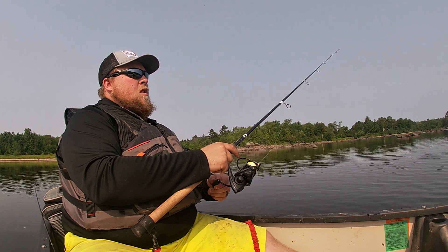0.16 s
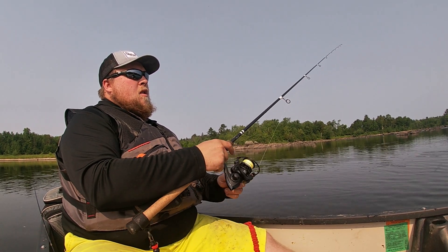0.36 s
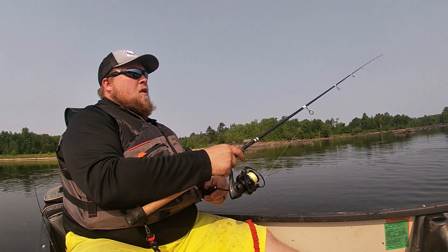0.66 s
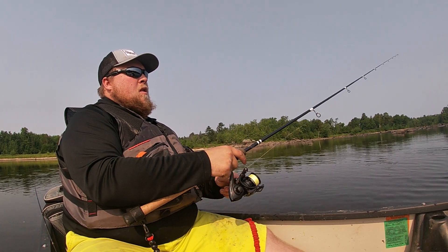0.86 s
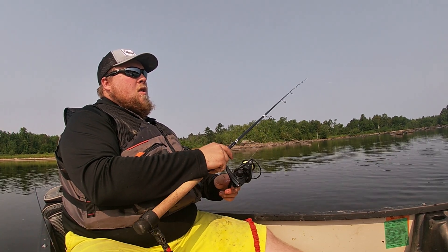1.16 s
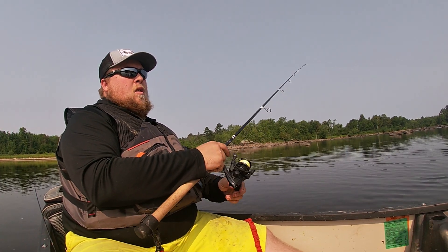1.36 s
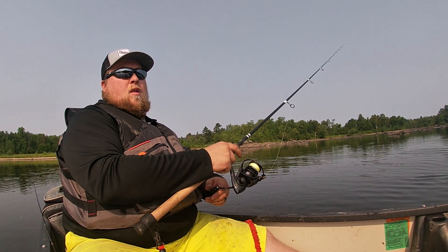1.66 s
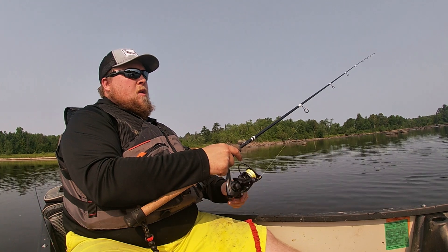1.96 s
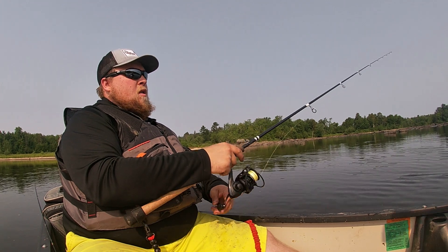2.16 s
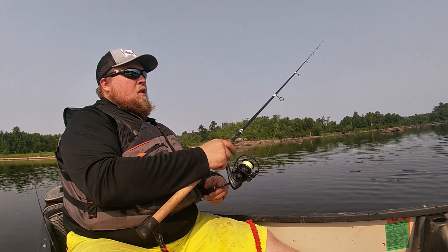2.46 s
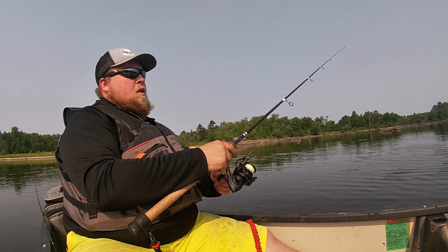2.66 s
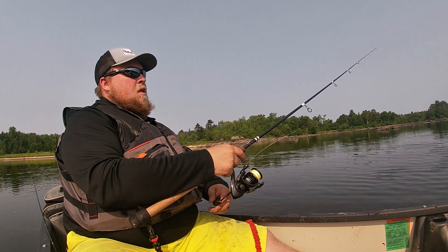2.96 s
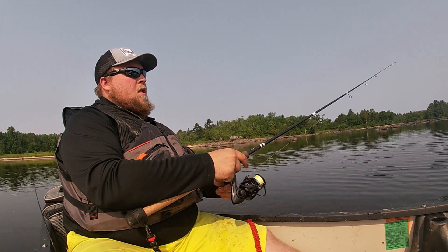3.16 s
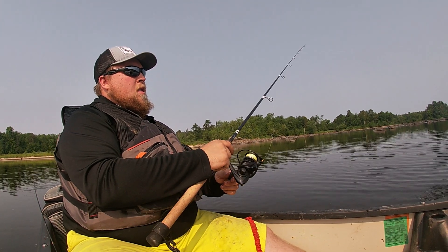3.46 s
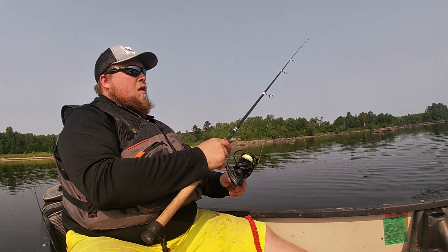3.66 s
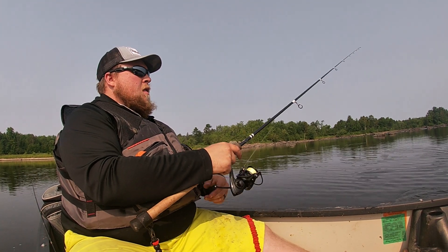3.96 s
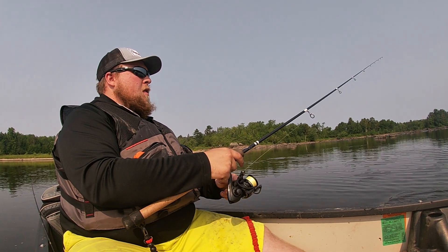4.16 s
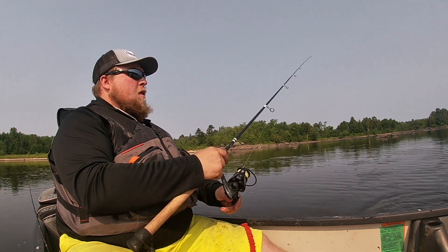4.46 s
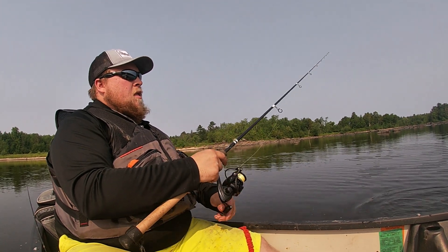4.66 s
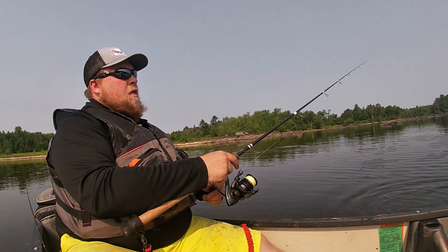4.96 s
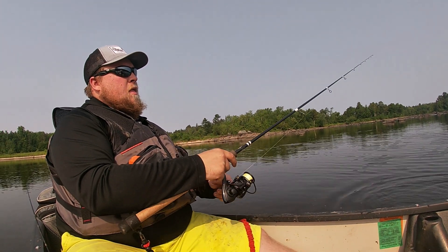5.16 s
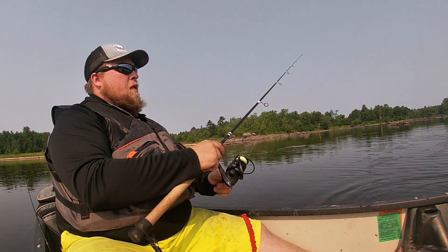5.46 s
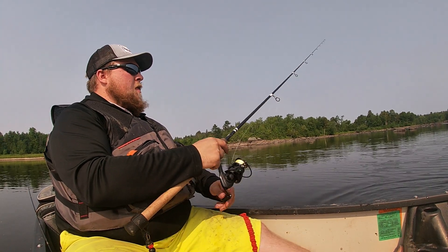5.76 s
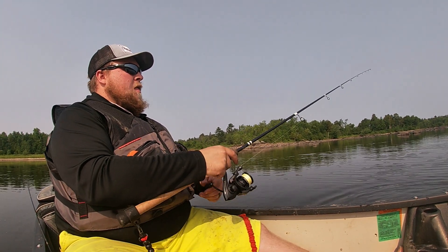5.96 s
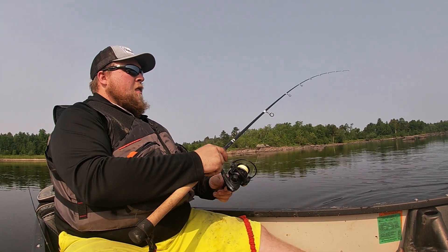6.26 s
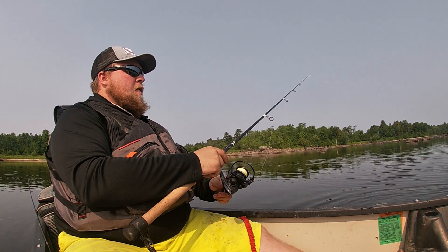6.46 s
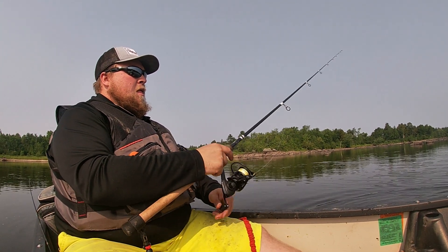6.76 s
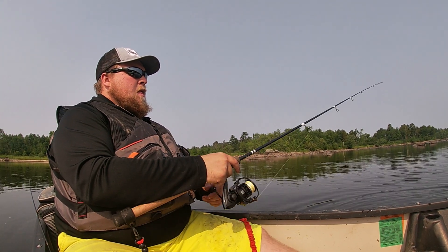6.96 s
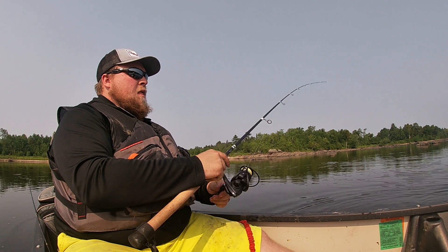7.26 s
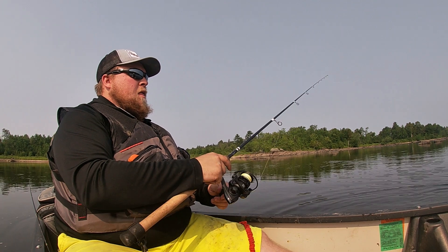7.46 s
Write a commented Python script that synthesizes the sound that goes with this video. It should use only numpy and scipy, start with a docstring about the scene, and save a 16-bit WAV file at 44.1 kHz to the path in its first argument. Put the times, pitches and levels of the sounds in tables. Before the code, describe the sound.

A soft, low hull rumble continues throughout, close and dry, with faint water wash and cloth hiss. From 0 to 0.9 s feet and gear strike the hollow canoe: a hard boomy knock at once, a dull thump at 0.14, clacks around 0.4-0.5, then a dense loud clatter at 0.64-0.86 with brief scrapes and ticks. A bird whistles faintly at 0.5. After a lull, smaller knocks come at 1.5-1.9, strongest near 1.73 and 1.84. A distant bird twitters quickly at 1.9-2.5. From 3.0 to 4.6 wavelets splash, plop and gurgle at the side, busiest at 3.7-4.5, with bright drips and low glugs. Heavy padded thuds land around 4.8. Sparse bubbles, small gear ticks, rustles and faint birds occupy 5-7 s. Soft hollow thumps cluster at 7.05-7.35, with one more at 7.55.

```python
"""Fishing from a canoe

An angler works a spinning rod in a canoe on calm water. Feet and gear knock and scrape on the hull: damped modes.
Wavelets lap and gurgle at the side as swarms of ringing bubbles; the reel ticks in bursts of resonant noise.
A jacket rustles and the hull rumbles softly all the time, both as shaped noise.
Songbirds, gliding sine tones, whistle faintly from the wooded shore."""
import sys
import numpy as np
from scipy import signal
from scipy.fft import rfft, irfft, next_fast_len
from scipy.io import wavfile
from scipy.ndimage import uniform_filter1d, map_coordinates

SR = 44100
rng = np.random.default_rng(int(sys.argv[2]) if len(sys.argv) > 2 else 0)


def int16_out(signal):
    """Quantize to a 16-bit WAV file."""
    q = np.round(np.clip(np.atleast_2d(signal).T, -1, 1) * 32767)
    wavfile.write(sys.argv[1], SR, q.astype(np.int16))


N = 336042  # samples in the scene


def amp(db):
    """Decibels to gain."""
    return 10 ** (np.asarray(db) / 20)


def unit(x):
    """Scale to rms 1."""
    return x / np.sqrt(np.mean(x ** 2) + 1e-20)


def along(points, hz):
    """(Hz, value) points interpolated on a logarithmic frequency axis."""
    f, v = np.transpose(points)
    return np.interp(np.log(hz + 1), np.log(f + 1), v)


def curves(rows):
    """One value per sample for each column after the time."""
    s, *cols = np.transpose(rows)
    return [np.interp(np.arange(N) / SR, s, c) for c in cols]


def wobble(rate):
    """A smooth random curve with rate knots a second."""
    knots = rng.standard_normal(int(N * rate / SR) + 4)
    return map_coordinates(knots, [np.arange(N) * rate / SR])


def filtered(x, response):
    """Linear filtering: the spectrum of x times a gain of frequency."""
    m = next_fast_len(len(x) + 8192)
    return irfft(rfft(x, m) * response(np.fft.rfftfreq(m, 1 / SR)), m)[:len(x)]


def causal(x, gain, size):
    """Minimum phase: a body with the given gain of frequency rings only after it is struck."""
    cepstrum = irfft(np.log(gain(np.fft.rfftfreq(size, 1 / SR))))
    cepstrum[1:size // 2] *= 2
    cepstrum[size // 2 + 1:] = 0
    return signal.fftconvolve(x, irfft(np.exp(rfft(cepstrum))))[:len(x)]


def noise(colour, patchy_db=2):
    """Random excitation of rms 1 with a given spectrum and drifting patches of gain."""
    z = signal.stft(rng.standard_normal(N), nperseg=512)[2]
    field = uniform_filter1d(rng.standard_normal(z.shape), size=4, axis=0)
    field = uniform_filter1d(field, size=10, axis=1)
    patchy = signal.istft(z * amp(patchy_db * unit(field)), nperseg=512)[1][:N]
    return unit(filtered(patchy, lambda hz: amp(along(colour, hz))))


def add(track, s, sound):
    """Superposition: mix a sound into the track at time s."""
    start = max(0, round(s * SR))
    part = sound[:max(0, N - start)]
    track[start:start + len(part)] += part


def swell(s, length, attack, release):
    """An envelope that rises around time s, holds for the length, then decays exponentially."""
    start, end = max(0, round((s - attack / 2) * SR)), round((s + length + 8 * release) * SR)
    out, t = np.zeros(N), np.arange(start, end) / SR - s
    add(out, s + t[0], np.clip(t / attack + .5, 0, 1) * np.exp(-np.maximum(t - length, 0) / release))
    return out


def broad_peak(f, hz, width, top_hz, order):
    """A strongly damped resonance: a broad peak in log frequency, rolled off above top_hz."""
    return 1 / (1 + (np.log((f + 1) / hz) / width) ** 2) / (1 + (f / top_hz) ** order)


# Spectra of the sway and the drone. Each row: frequency in Hz, relative density in dB per Hz.
SWAY = [(10, 22), (25, 5.5), (48, 21), (70, 16), (120, -55.5)]
DRONE = [(45, -32.5), (65, -6), (95, -6), (125, 3.5), (150, 2), (200, -8), (290, -13.5), (400, -21.5),
         (600, -54), (1000, -39), (2500, -109.5)]
# How hard the boat sways. Each row: time in seconds, level in dB before sway_db.
ROCKING = [(0, -33.5), (.42, -49.5), (.85, -65), (1.7, -48), (2.1, -61), (2.6, -45), (2.9, -55.5),
           (3.35, -46), (3.9, -56), (4.6, -57), (5.2, -60.5), (5.56, -43.5), (5.59, -34), (5.63, -45),
           (5.85, -51), (6.26, -52), (6.35, -34.5), (6.62, -44), (6.9, -36.5), (7.6, -45)]
# How loudly the hollow hull drones. Each row: time in seconds, level in dB before drone_db.
DRONING = [(.55, -39.5), (.9, -44), (1.5, -39.5), (2.1, -44), (3.3, -44.5), (4.5, -47), (5.25, -50.5),
           (6.4, -47), (6.65, -48.5), (7.15, -47.5), (7.6, -50)]


def rumble(sway_db=1, drone_db=1, throb_db=0.5, throb_rate=12):
    """Forced vibration: air and water rock the boat, and the hollow hull drones with them."""
    (sway,), (drone,) = curves(ROCKING), curves(DRONING)
    rocking = amp(sway + sway_db) * noise(SWAY, patchy_db=3.5)
    throb = throb_db * wobble(throb_rate)
    return rocking + amp(drone + drone_db + throb) * noise(DRONE, patchy_db=0.5)


# A songbird's slurred syllables. Each row: start in seconds, length in seconds, first pitch in Hz,
# last pitch in Hz, arch of the pitch in Hz, level in dB before level_db and the flutter.
SYLLABLES = [(0.502, 0.16, 3360, 2700, 99, -53), (1.878, 0.061, 3350, 3780, 127, -65),
             (1.937, .028, 3590, 3740, 160, -64), (1.972, 0.038, 3700, 3800, 170, -67),
             (2.005, 0.039, 3500, 3550, 51.5, -65), (2.034, 0.053, 3600, 3130, -110, -58.5),
             (2.174, 0.035, 3200, 3500, 638, -63.5), (2.215, 0.016, 3400, 4550, 0, -59),
             (2.227, 0.037, 4440, 4680, -2, -62), (2.253, 0.059, 4250, 3280, -130, -56),
             (2.307, 0.045, 3300, 2700, 50, -56), (2.335, .034, 2720, 2870, 0, -55),
             (2.36, 0.035, 2830, 3080, 43, -56), (2.396, 0.043, 2950, 3600, 90, -54),
             (2.435, 0.031, 3200, 3140, -28, -57), (5.084, 0.091, 2930, 2350, 6, -58.5),
             (5.32, 0.031, 3370, 3730, 14, -60), (5.399, 0.019, 3350, 2820, 40, -54.5),
             (5.478, .032, 2430, 2660, 2, -66), (5.503, 0.064, 2630, 2350, -20, -64),
             (5.552, 0.066, 2380, 3210, 81, -58), (6.543, 0.036, 4050, 3300, 0, -67),
             (7.107, 0.053, 3050, 3260, 96, -62), (7.174, 0.037, 2560, 3600, 245, -60),
             (7.353, 0.063, 3520, 2870, -85, -57.5)]
# A second, farther bird holds its pitch through each note. Each row: start in seconds, length in seconds,
# pitch in Hz, level in dB.
FAR_NOTES = [(4.588, .27, 3580, -69.5), (5.063, 0.053, 3520, -66), (5.21, 0.054, 3450, -67),
             (5.335, 0.058, 3450, -65), (5.455, 0.13, 3420, -78), (5.84, 0.37, 3440, -70)]


def birds(level_db=-3, waver=.02, flutter_db=2.8, echo_db=-7, echo_t60=.22):
    """Frequency modulation and scattering: a hoarse sliding song and held notes, blurred by the shore's trees."""
    song, hoarse = np.zeros(N), 1 + waver * (wobble(900) + wobble(60) / 2)
    for s, length, first_hz, last_hz, arch_hz, db in SYLLABLES:
        u = np.linspace(0, 1, int(length * SR))
        hz = first_hz + (last_hz - first_hz) * u + arch_hz * np.sin(np.pi * u)
        hz = hz * hoarse[round(s * SR):][:len(u)]
        envelope = np.sqrt(np.abs(np.sin(np.pi * u)))
        add(song, s, amp(db + level_db) * envelope * np.sin(2 * np.pi * np.cumsum(hz) / SR))
    song = song * amp(flutter_db * wobble(120))
    for s, length, note_hz, note_db in FAR_NOTES:
        t = np.arange(int(length * SR)) / SR
        add(song, s, amp(note_db) * np.sin(np.pi * t / length) * np.sin(2 * np.pi * note_hz * t))
    t = np.arange(SR // 2) / SR
    trees = rng.standard_normal(len(t)) * amp(-60 * t / echo_t60)
    return song + amp(echo_db) * signal.fftconvolve(song, trees / np.linalg.norm(trees))[:N]


# Spectra of the four bands of hiss, low to high. Each row: frequency in Hz, relative gain in dB.
GURGLE_COLOUR = [(200, 9.5), (450, 8), (750, 6), (1100, -12.5), (2000, -40.5)]
WASH_COLOUR = [(600, 5), (1200, 6), (1800, 3.5), (2200, 1.5), (3000, 2.5), (4300, -12.5), (8000, -48)]
RUSTLE_COLOUR = [(1500, -48.5), (3200, -3.5), (4500, 1.5), (6300, -1), (7500, -41.5), (10000, -27)]
FIZZ_COLOUR = [(5000, -2), (7000, 7.5), (8300, 4), (9500, -5.5), (11000, -12.5), (13500, -44), (15000, -39)]
# The water's slow stir along the side. Each row: time in seconds, deep gurgle in dB, surface wash in dB.
STIR = [(0, -45, -62), (1.2, -52, -63.5), (2.1, -57.5, -64.5), (2.8, -55, -63), (3.5, -51, -59),
        (4.3, -52, -53), (5.1, -62, -61), (7.6, -59, -66.5)]
# The treble hiss. Each row: time in seconds, level in dB.
TREBLE = [(0, -66), (.45, -74.5), (.8, -88.5), (2.75, -87), (3.3, -70.5), (4.3, -65.5), (4.95, -66),
          (5.45, -74.5), (5.95, -66.5), (6.65, -75.5), (6.95, -69.5), (7.6, -79)]
# Strokes of sleeve and gear. Each row: start in seconds, length in seconds, level in dB, brightness in dB.
RUBS = [(0.147, 0.2, -79, -15), (0.335, 0.082, -80, -5), (0.5, 0.16, -69, -19.5), (0.695, 0.13, -70, -25),
        (1.019, 0.17, -71, -21), (1.203, 0.15, -70, -18), (1.47, 0.11, -66, -13), (2.227, 0.027, -69, -4.5),
        (2.319, 0.087, -66.5, -11), (5.702, 0.18, -68, 6.5), (6.749, 0.051, -62, -0.5),
        (7.554, 0.094, -61.5, -1)]


def hiss(waves, grain_db=1.5, surge_db=-8, cloth_db=-78, rub_attack=.09, rub_release=0.036):
    """Friction and turbulence: water washes by, cloth and gear rub; dull strokes scrape, bright ones fizz."""
    # independent noises add as powers
    gurgle, wash = amp(curves(STIR)) ** 2 + (amp(surge_db) * waves) ** 2
    fizz = amp(curves(TREBLE)[0]) ** 2
    rustle = amp(cloth_db) ** 2 + fizz
    for s, length, db, bright_db in RUBS:
        stroke = (amp(db) * swell(s, length, rub_attack, rub_release)) ** 2
        bright = amp(bright_db) ** 2
        wash, rustle, fizz = wash + stroke / bright, rustle + stroke, fizz + stroke * bright
    water = np.sqrt(gurgle) * noise(GURGLE_COLOUR, patchy_db=3.5) + np.sqrt(wash) * noise(WASH_COLOUR, patchy_db=3.2)
    cloth = np.sqrt(rustle) * noise(RUSTLE_COLOUR) + np.sqrt(fizz) * noise(FIZZ_COLOUR)
    return (water + cloth) * amp(grain_db * wobble(150))


# Trains of wavelets that reach the boat. Each row: start in seconds, length in seconds, level in dB.
WAVELETS = [(3.314, 0.19, -57), (3.58, 0.051, -83), (3.706, 0.11, -54.5), (3.937, 0.12, -53),
            (4.173, 0.19, -51), (4.476, 0.067, -52.5), (4.68, 0.22, -67.5)]


def surge(attack=0.041, release=0.052, calm_db=-79):
    """Amplitude envelope of the lapping: each wavelet climbs the side and drains off, with calm between."""
    return amp(calm_db) + sum(amp(db) * swell(s, length, attack, release) for s, length, db in WAVELETS)


def bubble(hz, cycles, rise):
    """Bubble resonance: an air pocket rings for some cycles; its pitch rises as it nears the surface if rise > 0."""
    age = np.arange(int(SR * cycles / hz) + 2) * hz / (SR * cycles)
    phase = 2 * np.pi * cycles * (age + rise * age ** 2 / 2)
    return np.sin(phase) * amp(-60 * age) * (1 - np.exp(-age * cycles))


def lapping(count, centre_hz=1700, spread=.8, size_db=5, cycles=20, rise=0.14, tilt=0.22,
            life_spread=.45, rise_spread=.18):
    """Bubble swarm of rms 1: smaller bubbles ring higher and weaker, and each slides its own way."""
    out = np.zeros(N)
    normals = np.clip(rng.standard_normal((count, 3)), -2.5, 2.5)
    for when, (pitch, life, slide), size in zip(rng.random(count), normals, rng.exponential(size=count)):
        hz = centre_hz * np.exp(spread * pitch)
        if 380 < hz < 8500:
            sound = bubble(hz, cycles * np.exp(life_spread * life), rise + rise_spread * slide)
            add(out, when * N / SR, amp(size_db * min(size, 3)) * (centre_hz / hz) ** tilt * sound)
    return unit(out)


def trickle(count=600, size=7, centre_hz=2200, spread=.58, size_db=4, rise=0.11, lag=.0035, cycles=14):
    """Bubble clumps of rms 1: each running droplet bursts into short bubbles of all sizes, spread over some lag."""
    out = np.zeros(N)
    for when, strength in zip(rng.random(count), np.minimum(rng.exponential(size=count), 2.5)):
        for pitch, late in np.clip(rng.standard_normal((size, 2)), -2, 2):
            sound = bubble(centre_hz * np.exp(spread * pitch), cycles, rise)
            add(out, when * N / SR + lag * abs(late), amp(size_db * strength) * sound)
    return unit(out)


# The loudest plops at the side. Each row: start in seconds, level in dB before plop_db or shard_db,
# starting pitch in Hz, ring in cycles.
PLOPS = [(3.157, -24, 1550, 17), (3.158, -30.5, 1020, 11), (3.167, -35, 1160, 24), (3.183, -35.5, 1230, 30),
         (3.215, -41.5, 965, 40), (3.25, -43, 1280, 62), (3.3, -34, 2110, 31), (3.605, -41.5, 2470, 72),
         (3.607, -40, 1680, 73), (3.674, -19.5, 650, 8.2), (3.688, -37, 607, 30), (3.727, -32, 1140, 35),
         (3.772, -31, 790, 36), (3.773, -21.5, 1290, 9.1), (3.772, -26.5, 238, 17.5),
         (3.844, -30, 1690, 30), (3.924, -33, 1500, 16), (3.972, -32, 605, 20), (3.987, -26, 1630, 15),
         (4.004, -29.5, 1470, 20), (4.178, -23, 1310, 7.7), (4.221, -29.5, 800, 33), (4.295, -40, 1780, 24),
         (4.326, -27.5, 1190, 25), (4.521, -32.5, 1540, 20), (4.737, -36.5, 1810, 26),
         (4.898, -30.5, 1610, 11.5), (5.023, -39, 1970, 31), (5.271, -37.5, 1830, 34),
         (6.023, -36.5, 1670, 30), (6.388, -46, 1540, 47)]


def plops(plop_db=2, rise=0.089, count=6, spread=0.32, shard_db=-10, scatter=0.005, lag=0.0055, shard_cycles=11):
    """Entrained air: a wavelet traps a pocket against the side, and short-lived ones split off around it."""
    out = np.zeros(N)
    for s, db, hz, cycles in PLOPS:
        add(out, s, amp(db + plop_db) * bubble(hz, cycles, rise))
        for late, pitch in rng.standard_normal((count, 2)):
            shard = bubble(hz * np.exp(spread * pitch), shard_cycles, rise)
            add(out, s + lag + scatter * late, amp(db + shard_db) * shard)
    return out


# Sliding glugs in the hollows under the hull. Each row: start in seconds, length in seconds,
# first pitch in Hz, last pitch in Hz, level in dB before the roughness.
GLUGS = [(3.376, 0.032, 1000, 680, -53), (3.427, 0.019, 1280, 800, -43.5), (3.478, 0.032, 980, 535, -47),
         (3.629, 0.041, 547, 620, -43), (3.8, .03, 518, 1270, -42.5), (3.928, 0.02, 457, 560, -38),
         (3.934, 0.017, 1040, 1490, -41), (4.198, 0.038, 493, 890, -43), (4.272, 0.034, 397, 353, -26.5),
         (4.297, 0.032, 343, 393, -39.5), (4.323, 0.0264, 1175, 1610, -48), (4.33, 0.034, 477, 558, -37.5),
         (4.362, 0.031, 726, 890, -45.5), (4.472, 0.033, 476, 674, -42.5), (4.545, 0.049, 363, 373, -41)]


def glugs(rough_db=1.5):
    """Cavity resonance: a hollow between water and hull opens or closes, so its note swells and slides."""
    out = np.zeros(N)
    for s, length, first_hz, last_hz, db in GLUGS:
        u = np.linspace(0, 1, int(length * SR))
        hz = first_hz * (last_hz / first_hz) ** u
        add(out, s, amp(db) * np.sin(np.pi * u) * np.sin(2 * np.pi * np.cumsum(hz) / SR))
    return out * amp(rough_db * wobble(180))


def splat(hz, width=0.47, t60=.034, attack=.0008):
    """Impact noise: the broad, brief burst of water striking water."""
    t = np.arange(SR // 25) / SR
    burst = unit(filtered(rng.standard_normal(len(t)), lambda f: broad_peak(f, hz, width, 8200, 12)))
    return burst * amp(-60 * t / t60) * (1 - np.exp(-t / attack))


# Bright drops of the splashing water. Each row: start in seconds, level in dB before splat_db or ping_db,
# central pitch in Hz.
DROPS = [(3.035, -40, 5400), (3.044, -46.5, 6300), (3.057, -36.5, 4550), (3.078, -48.5, 7400),
         (3.156, -47.5, 6100), (3.168, -59, 6700), (3.182, -60, 6100), (3.216, -59, 5200),
         (3.287, -41, 5500), (3.301, -44.5, 4250), (3.309, -42, 5300), (3.33, -46, 4800),
         (3.373, -42, 3520), (3.431, -47, 4250), (3.484, -44.5, 5530), (3.606, -46, 4170),
         (3.674, -45.5, 4800), (3.725, -41, 4800), (3.772, -42, 5200), (3.795, -42, 3270),
         (3.877, -51.5, 7000), (3.988, -48.5, 3600), (4.048, -39.5, 5470), (4.085, -39, 4230),
         (4.11, -42, 4260), (4.238, -39.5, 5260), (4.249, -38.5, 3320), (4.328, -40, 5400),
         (4.426, -36, 3100), (4.511, -34.5, 3700)]


def drops(splat_db=-4, count=10, spread=0.406, lag=0.0057, ping_db=-10, cycles=30, rise=0.053):
    """Impact and bubble resonance: a drop slaps the surface and leaves a handful of tiny pinging bubbles."""
    out = np.zeros(N)
    for s, db, hz in DROPS:
        add(out, s, amp(db + splat_db) * splat(hz))
        for late, pitch in zip(rng.exponential(size=count), rng.standard_normal(count)):
            ping = bubble(hz * np.exp(spread * np.clip(pitch, -2, 1)), cycles, rise)
            add(out, s + lag * late, amp(db + ping_db) * ping)
    return out


def lapping_water(waves):
    """Superposed bubbles: the wavelets' envelope shapes five swarms; plops, glugs and drops stand out."""
    droplets = amp(-1) * trickle()
    swarm = amp(-1.5) * lapping(count=5500, size_db=3.5)
    burble = amp(-1) * lapping(count=700, centre_hz=961, spread=.55, size_db=2, cycles=30, rise=.3, tilt=0.18)
    spray = amp(-9) * lapping(count=2000, centre_hz=4840, spread=0.36, cycles=37, rise=0.08, tilt=0.062)
    plinks = amp(-5) * lapping(count=420, centre_hz=2300, spread=.5, size_db=3, cycles=32, rise=.05)
    return plops() + glugs() + drops() + waves * (droplets + plinks + swarm + burble + spray)


# The clearest ticks of reel, line and gear. Each row: start in seconds, level in dB before tick_db and
# the chatter, pitch in Hz.
TICKS = [(0.308, -35, 6900), (0.35, -53, 7440), (.379, -63, 7200), (.391, -43, 6540), (.408, -48, 7400),
         (.4744, -54, 7440), (0.732, -43.5, 3980), (0.782, -44.5, 3800), (1.807, -46.5, 2700),
         (2.012, -55, 2960), (2.486, -53, 3900), (4.62, -41, 3130), (4.9746, -41.5, 5330),
         (5.047, -47.5, 3680), (5.293, -49, 2150), (5.665, -50, 3230), (5.709, -45, 2710),
         (6.022, -41, 2460), (6.033, -47.5, 2000), (6.35, -48.5, 2980), (6.3878, -47, 3200),
         (6.397, -53, 2300), (6.5134, -53.5, 4500), (6.63, -51.5, 4160), (7.3433, -43.5, 4040),
         (7.483, -49, 4180)]


def ticks(tick_db=-2, t60=0.022, width=0.31, tail_db=-16, tail_t60=0.14, attack=.00025,
          chatter_db=4, chatter_rate=420):
    """Small hard contacts: a sharp burst in one broad resonance, then a weak rattle of the parts around it."""
    out, t = np.zeros(N), np.arange(SR // 10) / SR
    decay = amp(-60 * t / t60) + amp(tail_db - 60 * t / tail_t60)
    envelope = decay * (1 - np.exp(-t / attack))
    for s, db, hz in TICKS:
        burst = unit(filtered(rng.standard_normal(len(t)), lambda f: broad_peak(f, hz, width, 9000, 10)))
        add(out, s, amp(db + tick_db) * envelope * burst)
    return out * amp(chatter_db * wobble(chatter_rate))


def ring(t, hz, t60, build):
    """A damped mode that needs build cycles to fill."""
    return amp(-60 * t / t60) * (1 - np.exp(-t * hz / build)) ** 2 * np.sin(2 * np.pi * hz * t)


# The hull's modes. Each row: frequency in Hz, relative level in dB, t60 in seconds.
HULL = [(75.4, -3.5, 0.2), (121.4, -12.5, 0.21), (124.3, -7, 0.61), (164, -5.5, 0.17), (188.7, -13.5, 0.18),
        (218, -10, 0.34), (248.4, 1.5, 0.029), (288, -11.5, 0.32), (345.4, -7, 0.22), (389.7, -8.5, 0.16),
        (421, -2.5, .12), (478, -7, 0.1), (568.4, -15.5, 0.071), (626, -23.5, 0.12), (795, -9, 0.087),
        (986, -19.5, 0.13), (1191, -12, 0.075), (1298, -8.5, 0.054), (1366, -14, 0.068),
        (1540, -14.5, 0.13), (1636, -13.5, 0.063), (1902, -19.5, 0.099), (2260, -21.5, 0.077),
        (2640, -26.5, 0.051), (2740, -23, 0.12), (3060, -20.5, 0.11)]


def hull_modes(t, build):
    """Modal synthesis: the frequencies of the hull's modes and the ring of each, one per row."""
    hz, mode_db, t60 = np.transpose(HULL)[:, :, None]
    return hz[:, 0], amp(mode_db) * ring(t, hz, t60, build)


def clusters(f, width=.03, valley_db=-9):
    """Modal overlap: crowded modes are strong near the hull's main modes, weak between, even in the treble."""
    hz = np.transpose(HULL)[0][:, None]
    nearness = np.max(1 / (1 + ((f - hz) / (width * hz)) ** 2), axis=0)
    return amp(valley_db * (1 - nearness) * (f < 1.1 * hz.max()))


# Force of an ordinary blow. Each row: frequency in Hz, level in dB relative to the blow's driving level.
FORCE = [(75, -13), (122, -16), (160, -7.5), (245, -10), (290, -11.5), (420, -15.5), (490, -9.5),
         (780, -17.5), (1000, -16.5), (3200, -24), (5000, -53), (9000, -62)]
# Weight feeds the floor's low modes and spares the side walls; hardness feeds the highest modes.
# Each row: frequency in Hz, share in dB per dB.
WEIGHT_SHARE = [(85, 0.96), (125, 0.96), (170, -0.051), (245, 0.14), (330, -0.43), (470, 0.14),
                (1000, -0.12)]
HARDNESS_SHARE = [(245, 0.05), (400, 0.3), (1000, 0.8), (3200, 0.82), (6000, 1.66)]
# A padded blow no longer rings the walls. Each row: frequency in Hz, loss in dB per dB of padding.
PADDING = [(245, 0.5), (290, 5), (420, 4), (490, 0.5)]


def force(weight_db, hardness_db, padded_db=-18):
    """Contact spectrum (Hz, dB): a heavy blow booms, a hard one clacks, one softer than padded_db only thuds."""
    hz, db = np.transpose(FORCE)
    padding = max(0, padded_db - hardness_db) * along(PADDING, hz)
    weight = weight_db * along(WEIGHT_SHARE, hz)
    return hz, db + weight + hardness_db * along(HARDNESS_SHARE, hz) - padding


# Scrapes between the blows. Each row: start in seconds, length in seconds, level in dB.
SCRAPES = [(0.22, 0.11, -45), (0.327, 0.11, -40.5), (.405, .015, -39), (0.467, 0.015, -35),
           (0.695, 0.038, -28.5), (0.755, 0.046, -36.5), (0.818, 0.036, -35.5), (1.705, .014, -35)]


def scrapes(slips_per_s=420, size_db=8, weight_db=-26, hardness_db=6, attack=0.013, release=.006):
    """Stick-slip friction: a boot drags over the floor in tiny slips, and each slip taps the hull's modes."""
    hz, modes = hull_modes(np.arange(SR // 3) / SR, build=1)
    shell = amp(along(np.transpose(force(weight_db, hardness_db)), hz)) @ modes
    slips = unit((rng.random(N) < slips_per_s / SR) * amp(size_db * rng.standard_normal(N)))
    drag = sum(amp(db) * swell(s, length, attack, release) for s, length, db in SCRAPES)
    return signal.fftconvolve(slips * drag, shell / np.linalg.norm(shell))[:N]


# Crowded upper modes between the main ones. Each row: frequency in Hz, relative density in dB per Hz.
CROWD = [(60, -42.5), (200, -0.5), (450, 1), (750, -0.5), (1400, -5), (2100, -0.5), (3200, -4.5),
         (5000, 3.5), (7500, 0.5), (10000, -14.5), (14000, -19)]
# Their decay. Each row: frequency in Hz, t60 in seconds.
CROWD_LIFE = [(200, 0.2), (1000, 0.2), (3000, 0.074), (9000, 0.063)]


def crowd(strength, size):
    """Statistical modes, too dense to tell apart: noise in which each frequency dies at its own speed."""
    hz, t, z = signal.stft(rng.standard_normal(size), SR, nperseg=256)
    gain = amp(along(CROWD, hz) + along(strength, hz))[:, None]
    decay = amp(-60 * t / along(CROWD_LIFE, hz)[:, None])
    return signal.istft(z * gain * decay, SR, nperseg=256)[1][:size]


# Blows on the hull. Each row: start in seconds, driving level in dB, pitch of the struck panel in Hz,
# ring of the striker in Hz, weight behind the blow in dB, hardness of the contact in dB,
# overtone of the panel in dB, relative level of the striker's ring in dB,
# t60 in seconds of the damping by the resting striker.
BLOWS = [(.001, -11.5, 213, 1680, 17, 17, -10, 1, 0.27),
         (0.0512, -17.5, 209, 1680, 19, 12.5, -39, 4.5, 1.7), (.096, -18, 216, 1693, -9, 11, -29, 2.5, 2.8),
         (0.137, -8.5, 125, 1360, 14.5, -35.5, -18, 4, 6.8), (.307, -27.5, 143, 1514, 12, 23, -10, -1, 2.7),
         (.389, -21.5, 231, 1520, 10, 2, -20, 3, 1.4), (.424, -10, 188, 724, 9, 8, -6.5, -2, 0.31),
         (0.49, -11.5, 390, 984, 0.5, 3.5, -32, 2, 1.5), (.498, -20.5, 198, 1646, -16, 13, -20, 1.5, 1.8),
         (.638, -2.5, 218.4, 1228, -18.5, -8, -3.5, 3, 0.35),
         (.647, -7.5, 229, 1495, -7, 1.5, -0.5, 0, 0.047), (.659, -10, 398, 640, -22, -8.5, -11, 4.5, 0.55),
         (.694, -9.5, 188, 1240, -8.5, -15, -10.5, 12, 0.26),
         (.714, -9, 199, 2746, -28, 0.5, -11, -3.5, 0.24),
         (.7295, -11.5, 337, 1860, -15, 6, -24, -5, 0.089), (.78, -19.5, 266, 1660, -14, 4, -16, 1, .3),
         (.81, -9, 223, 1270, -27, -4, -0.5, -3, 0.31), (.8185, -19, 231, 1520, -14, 3, 10, 5, 0.24),
         (.839, -17, 182, 1416, -15, -1, -3, -2, 0.5), (.857, -18.5, 184, 1310, -28, -2, 0, -1, .4),
         (1.487, -26, 215.6, 1820, 17.5, -19.5, -15, 9, 2.5),
         (1.559, -30.5, 148, 1464, -9, 2.5, -20, -1, 2), (1.644, -23.5, 147, 1255, -14, 2, -9, -1.5, 1),
         (1.727, -13, 196, 1220, 3, -0.5, -15, -5, 1.6), (1.746, -14, 348, 930, 6.5, -18, -13.5, 0.5, 1.2),
         (1.83, -26.5, 261, 865, -2, 9, -13, 2, 1.1), (1.838, -5.5, 200, 950, -9.5, -19, -16, -3, 1.3),
         (1.864, -24, 225, 984, 9, 5, -20, -1, 1), (3.046, -29, 189, 684, -28, 2, -21, 10, 0.23),
         (4.476, -20, 143, 940, 3, -22.5, -28, 0, 1.2),
         (4.7634, -8.5, 229.7, 1170, 17.5, -18.5, -21, 4, 0.44),
         (4.7875, -5, 153, 930, 8, -38, -29, 6, 0.71), (4.821, -14.5, 125, 920, 20.5, -40.5, -31, -5, 3.6),
         (7.057, -15, 189, 990, 8.5, -16, -22, 0, 2), (7.103, -15, 152.5, 1110, 8, -20, -17, -1, 2.2),
         (7.12, -25, 160, 795, 13, 5.5, -14, -1, 2), (7.147, -13, 180, 1080, 12.5, -8.5, -21.5, 1.5, 0.81),
         (7.212, -8.5, 152, 920, 15.5, -46, -15, 5, 2), (7.325, -34, 186, 810, 8, 14, -12, 0, 1.8),
         (7.346, -26, 142, 1515, 3.5, 2.5, -27, 1, 1.7), (7.552, -12.5, 218, 825, -1, -7, -16.5, 5, 2.4)]


def hull(ring_db=3.5, crowd_db=11, build_cycles=0.85, scatter_db=1, contact_s=0.00063,
         panel_db=10, panel_t60=0.13, panel_build=1, striker_t60=0.057, lead_in_db=-15, lead_in_s=0.015,
         overtone_ratio=1.95, overtone_t60=0.088):
    """Impact excitation of modes: each blow rings the hull and damps it as it rests there."""
    out, clacks, t = np.zeros(N), np.zeros(N), np.arange(SR // 2) / SR
    lead_in_t = t[:SR // 16]
    hz, modes = hull_modes(t, build_cycles)
    for (s, level_db, panel_hz, striker_hz, weight_db, hardness_db,
         overtone_db, striker_db, rest_t60) in BLOWS:
        strength = [(f, level_db + db) for f, db in zip(*force(weight_db, hardness_db))]
        gains = amp(along(strength, hz) + scatter_db * rng.standard_normal(len(HULL)))
        damping = amp(-60 * t / rest_t60)
        # the struck patch of the shell flexes at its own pitch with one overtone, and the striker rings briefly
        overtone = amp(overtone_db) * ring(t, overtone_ratio * panel_hz, overtone_t60, panel_build)
        flex = ring(t, panel_hz, panel_t60, panel_build) + overtone
        panel = amp(along(strength, panel_hz) + panel_db) * flex
        striker = amp(along(strength, striker_hz) + striker_db) * ring(t, striker_hz, striker_t60, panel_build)
        add(out, s, damping * (amp(ring_db) * gains @ modes + panel + striker))
        clack = amp(crowd_db) * crowd(strength, size=len(t)) * (1 - np.exp(-t / contact_s))
        add(clacks, s, damping * clack)
        # a faint noise swells just before the blow
        lead_in = crowd(strength, size=len(lead_in_t)) * (1 - np.exp(-lead_in_t / lead_in_s))
        add(clacks, s - lead_in_s, amp(lead_in_db) * lead_in)
    return out + causal(clacks, clusters, size=4096)


def scene():
    """Superposition of all sources: those in and at the boat are close and dry on open water."""
    waves = surge()
    background = rumble() + birds() + hiss(waves)
    return (background + lapping_water(waves) + ticks() + scrapes() + hull())[None]


def record(dry, top_hz=14300):
    """Band limiting: nothing passes at or above top_hz."""
    return np.array([filtered(channel, lambda hz: hz < top_hz) for channel in dry])


dry = scene()
out = record(dry)
int16_out(out)
```